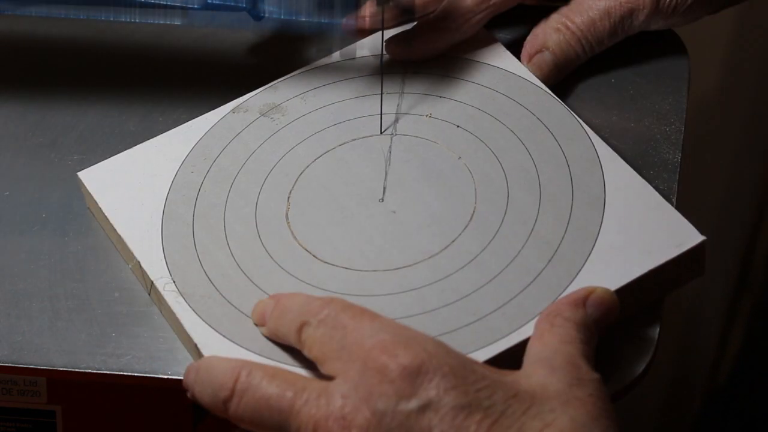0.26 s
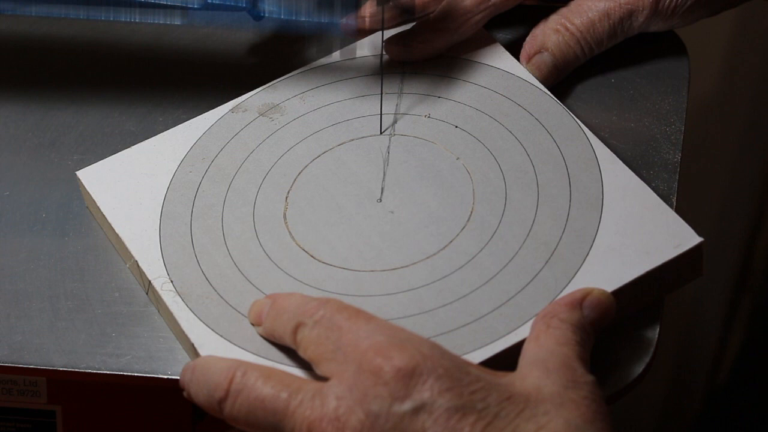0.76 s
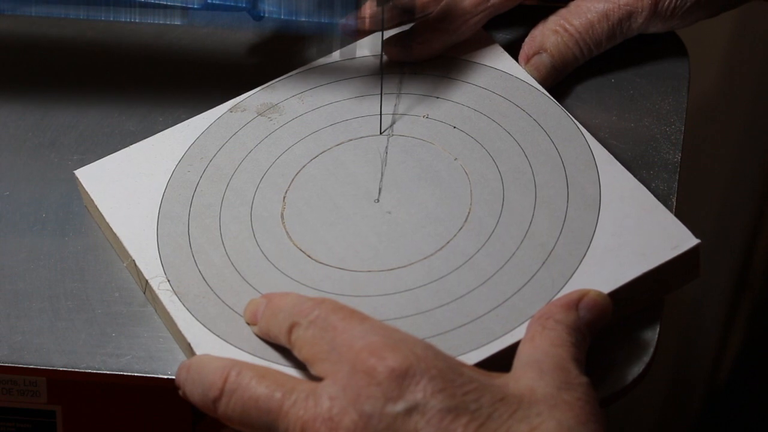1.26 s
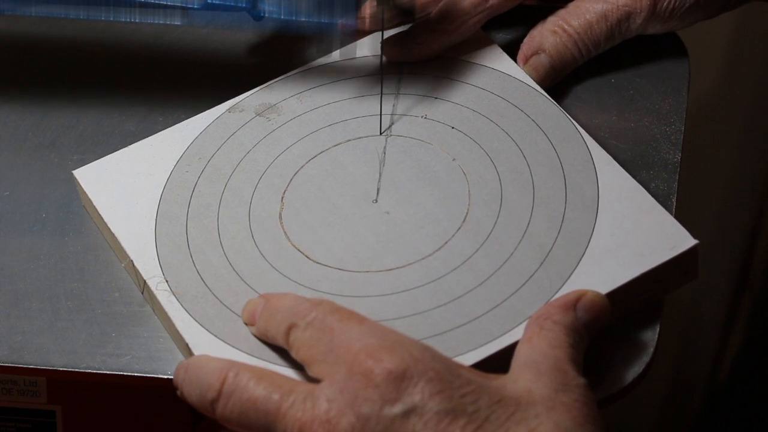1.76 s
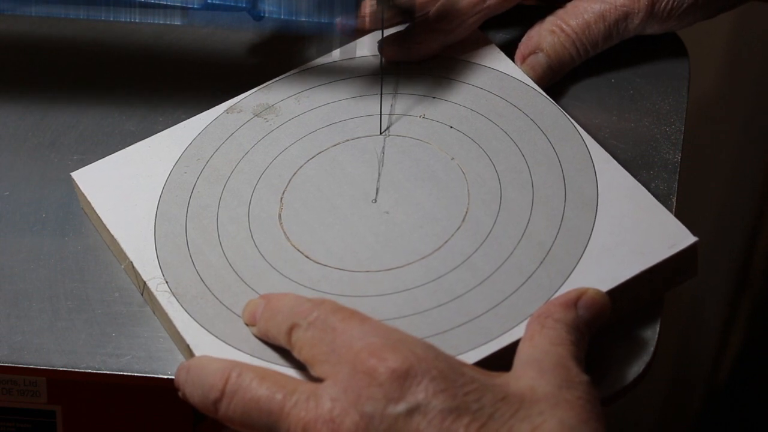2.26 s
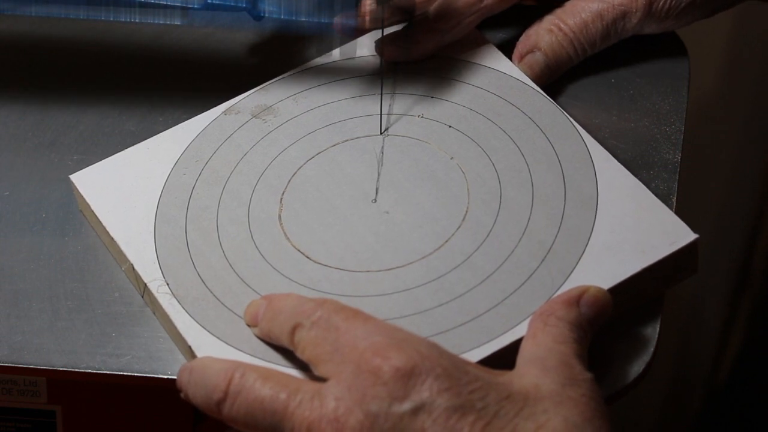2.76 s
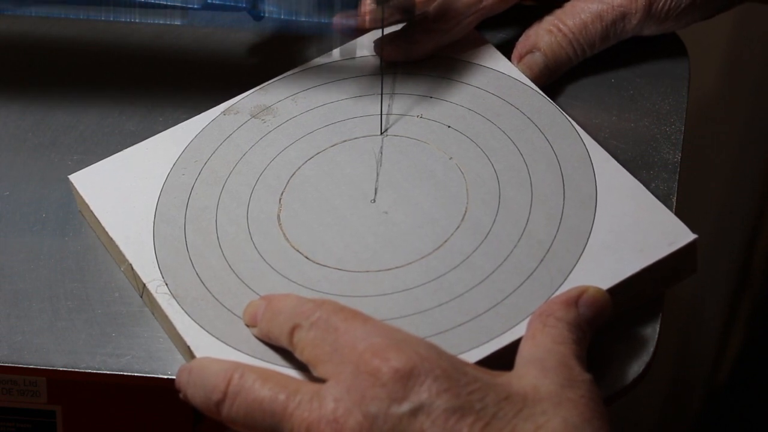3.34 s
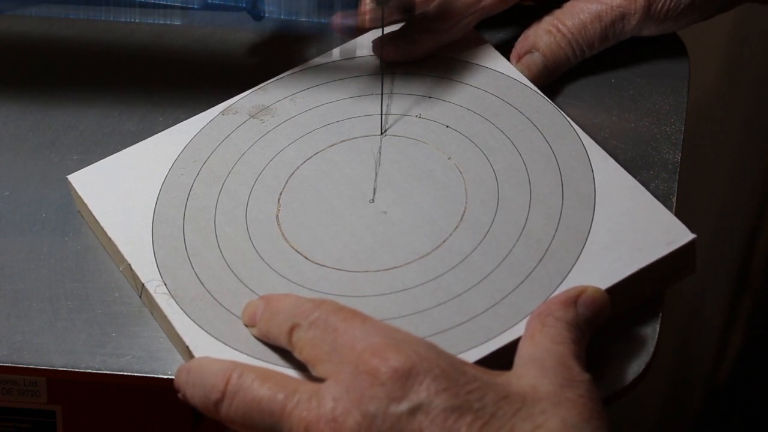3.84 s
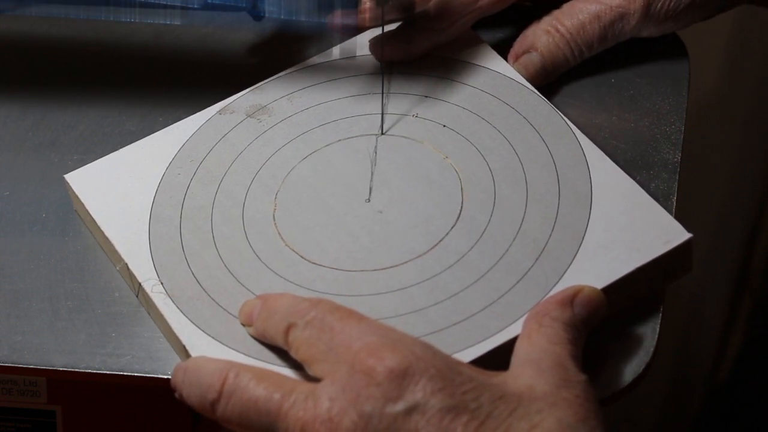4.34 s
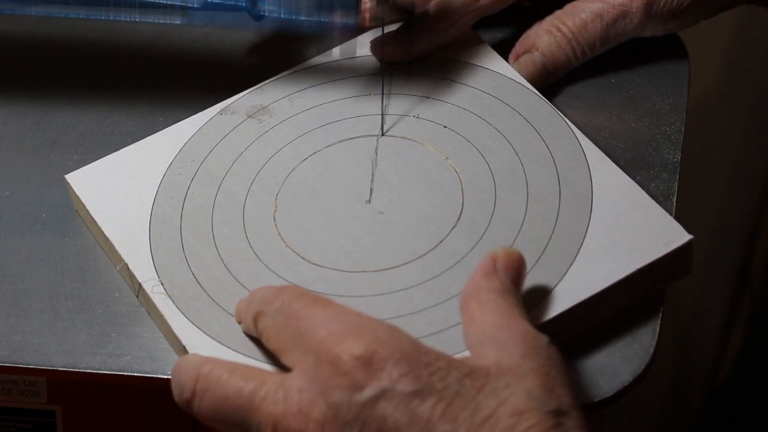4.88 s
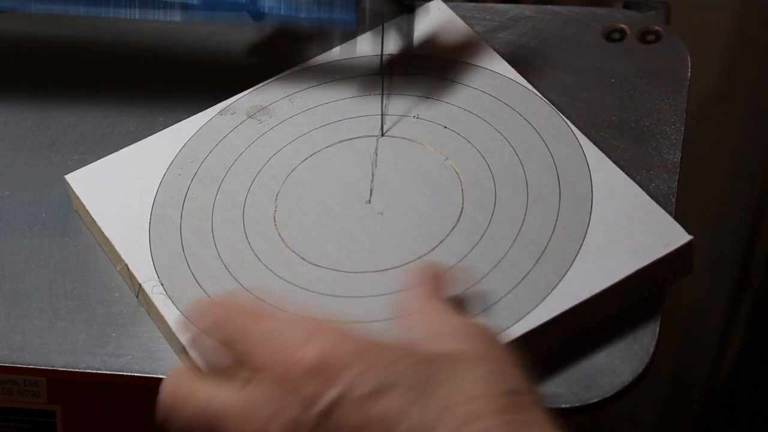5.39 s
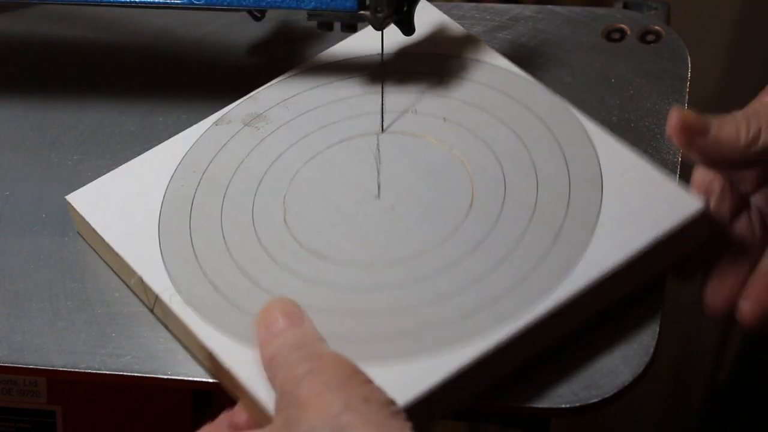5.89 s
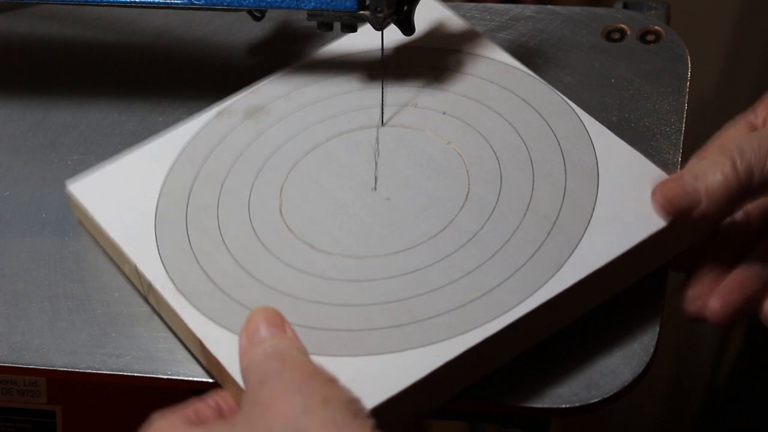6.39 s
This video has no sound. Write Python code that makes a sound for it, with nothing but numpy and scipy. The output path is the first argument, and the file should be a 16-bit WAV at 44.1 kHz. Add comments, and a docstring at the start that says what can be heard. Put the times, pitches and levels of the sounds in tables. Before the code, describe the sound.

In a small workshop, close up, a scroll saw cuts wood with a fast, rough buzz of about 28 strokes per second, rattling and rasping. Cutting stops after four seconds and the motor coasts down, its clacks spreading apart and fading with scratchy rubs and airy puffs. The board then slides and knocks on the metal table over faint room noise.

```python
"""A scroll saw cuts a board: one crank angle drives frame shake, table hum, board buzz, blade snap and tooth rasp,
as tones at crank multiples and as noise or impulses per stroke through resonances.
Feeding stops, the motor coasts down with rubbing, puffs, creaks and linkage clacks (struck decaying modes).
Hands then slide, knock and push the board on the metal table, over a workshop's short tail and floor noise."""
import sys
import numpy as np
from scipy import signal
from scipy.fft import rfft, irfft, next_fast_len
from scipy.io import wavfile
from scipy.ndimage import uniform_filter1d

SR = 44100
rng = np.random.default_rng(int(sys.argv[2]) if len(sys.argv) > 2 else 0)


def to_wav(sig):
    """Store sig (one row per channel, or 1-D mono) as 16-bit WAV at the path in sys.argv[1].

    Samples outside -1..1 are clipped; the rate is SR.
    """
    pcm = np.clip(np.atleast_2d(sig), -1, 1) * 32767
    pcm = np.round(pcm).astype(np.int16)
    wavfile.write(sys.argv[1], SR, pcm.T)  # frames by channels


N = 291942
T_S = np.arange(N) / SR
IDLE_FROM_S = 4.3
# crank speed: (time [s], speed [strokes/s])
CRANK_SPEED = [(0, 27.823), (2.6, 27.823), (3, 27.852), (4.3, 27.852), (4.45, 27.95), (4.55, 25.7),
               (4.75, 22.278), (5.05, 16.182), (5.35, 10.881), (5.65, 6.294), (5.95, 0)]
# crank orders that the table amplifies: (multiple of crank speed, level [dB])
TABLE_ORDERS = [(13, -12), (14, -3), (15, 2), (16, -4), (17, -14), (18, -11), (19, -4), (20, -12)]
# blade clamp resonances: (frequency [Hz], width [Hz], level [dB])
CLAMP_MODES = [(3920, 30, -31), (4980, 24, 5.5), (5250, 170, 4), (6530, 85, 0.5), (6880, 20, 10),
               (7170, 15, 1), (9090, 250, -7), (10420, 65, -3)]
# blade rubbing in the kerf, spectrum: (frequency [Hz], density [dB per Hz])
RUB_SPECTRUM = [(760, -21), (1300, 6.5), (2080, -2), (2260, -26), (2570, 4), (3680, -2.5), (5050, -2.5),
                (7050, -5.5), (8150, -7.5), (10000, -13), (13000, -55), (22000, -120)]
# dust bellows air, spectrum: (frequency [Hz], density [dB per Hz])
PUFF_SPECTRUM = [(7000, -43), (10500, -10), (13000, -1), (15700, -12)]


def crank():
    """Crank angle in strokes: the integral of crank speed."""
    first_turn = -.41
    return first_turn + np.cumsum(np.interp(T_S, *np.transpose(CRANK_SPEED))) / SR


def speed_share():
    """Crank speed as a share of full speed."""
    s, speed = np.transpose(CRANK_SPEED)
    return np.interp(T_S, s, speed / speed.max())


def saw():
    """The cutting saw: crank-driven parts, each at its own gain."""
    turns = crank()
    hum, buzz, ring, snap, rattle, rasp = cutting_gains()
    chatter = evened(repeating(turns, memory=3.9, fresh=0.18))
    body = table_hum(turns, hum) + 1.3 * board_growl(turns) + 1.76 * buzz * board_buzz(turns)
    plate = 1.01 * ring * insert_plate(turns, chatter)
    return body + plate + snap * blade(turns, snap, chatter) + rattle * arm(turns) + rasp * teeth(turns)


def cutting_gains():
    """Gains of six cutting parts; all but the table hum die when the board is held back."""
    # parts set ringing by the cut: (time [s], table hum [dB], board buzz [dB], insert plate ring [dB])
    body_levels = [(0.0, -42.5, -36, -48), (0.06, -41.5, -37, -39), (0.09, -47, -39.5, -47),
                   (0.31, -40.5, -46, -32.5), (0.43, -40.5, -45, -41.5), (0.57, -43.5, -40.5, -41),
                   (0.65, -40.5, -46, -43), (0.86, -39, -40, -43), (0.95, -41, -44, -44),
                   (1.01, -42, -50, -42), (1.07, -42, -47, -50), (1.3, -41.5, -45, -43),
                   (1.36, -40, -61, -41), (1.4, -39, -44, -36.5), (1.57, -42.5, -40.5, -41),
                   (1.65, -43, -44.5, -43), (1.74, -34, -37.5, -42), (1.87, -40.5, -43, -32.5),
                   (1.94, -37.5, -38.5, -33), (2.51, -39.5, -38.5, -37.5), (2.65, -40.5, -45.5, -35),
                   (2.9, -41.5, -43.5, -37), (2.98, -42, -46, -37), (3.11, -42, -43, -55),
                   (3.36, -43, -42, -37), (3.53, -40, -47, -41), (3.63, -52, -51, -37),
                   (3.71, -43, -44.5, -51), (3.88, -41.5, -41.5, -40), (4.0, -41.5, -51, -41),
                   (4.1, -42.5, -47, -41), (4.3, -42.5, -40.5, -58)]
    # feed pressure as blade snap level: (time [s], level [dB])
    feed_levels = [(0.04, -37.5), (.13, -35), (.25, -44), (.33, -33), (.51, -40), (.65, -33.5),
                   (.79, -38.5), (.97, -30), (1.16, -39), (1.48, -34), (1.74, -34), (1.84, -42.5),
                   (1.98, -36), (2.07, -46), (2.53, -35.5), (2.73, -41), (2.86, -31.5), (3.1, -31),
                   (3.42, -43), (3.55, -31.5), (3.74, -29), (3.93, -36), (4.1, -32.5), (4.18, -33),
                   (4.23, -39)]
    # arm rattle: (time [s], level [dB])
    rattle_levels = [(0.04, -33), (.13, -32.5), (.3, -33), (.55, -36.5), (.67, -33), (.79, -38), (1., -32),
                     (1.16, -34.5), (1.4, -30), (1.62, -36), (1.74, -33), (1.9, -37), (2., -35.5),
                     (2.53, -37), (2.73, -32.5), (3.4, -42.5), (3.64, -37), (4., -45.5), (4.22, -44)]
    # tooth rasp at full feed: (time [s], level [dB])
    rasp_levels = [(0.04, -36), (1., -37.5), (2., -37), (3., -37), (3.5, -38), (4., -41), (4.18, -35.5),
                   (4.23, -41)]
    cut_end_s, let_go_db_per_s = 4.239, 223
    rasp_share, full_feed_db = 0.17, -32  # the rasp follows the feed by this share of its dB
    held = amp(-let_go_db_per_s * np.maximum(T_S - cut_end_s, 0))
    hum, buzz, ring = gains(body_levels)
    snap, rattle = gains(feed_levels)[0], gains(rattle_levels)[0]
    rasp = gains(rasp_levels)[0] * (snap / amp(full_feed_db)) ** rasp_share
    return hum * (T_S < IDLE_FROM_S), buzz * held, ring * held, snap * held + 1e-9, rattle * held, rasp * held


def blade(turns, snap, chatter):
    """Blade snaps at each reversal, bites on and buzzes; the mix follows the snap gain."""
    # stiff, quickly damped blade modes: (frequency [Hz], width [Hz], level [dB])
    snap_modes = [(1815, 210, 0), (2220, 210, 0)]
    # buzzing blade modes: (frequency [Hz], width [Hz], level [dB])
    buzz_modes = [(1680, 540, -11), (1831, 23, 0), (1990, 120, -7), (2194, 39, -2.5)]
    tooth_gap_strokes = .1375  # the next tooth catches just after the reversal
    catches = reversals(turns) + 0.3 * reversals(turns - tooth_gap_strokes)
    burst = resonant(resonant(catches, snap_modes), snap_modes)
    buzzing = resonant(stroke(turns, 0.5, [(0.0023, 0.078, 0.26, 0.8)]) * chatter, buzz_modes)
    # the teeth dig in at once and keep biting for a quarter stroke
    digging = np.clip((0.27 - (turns + 0.036) % 1) / 0.21, 0, 1)
    bite = digging * repeating(turns, memory=11.0, fresh=0.19)
    bitten = resonant(resonant(bite, snap_modes), snap_modes)
    # harder feeding raises the snap faster than the chatter
    burst_gain = 0.83 * (snap / amp(-28.0)) ** 0.4
    buzz_gain = 0.54 * (snap / amp(-17.5)) ** -.3
    return burst_gain * burst + 0.48 * bitten + buzz_gain * buzzing


def teeth(turns):
    """Teeth tear fibres hardest on the down stroke; dust hisses on both strokes."""
    # torn fibres, spectrum: (frequency [Hz], density [dB per Hz])
    rasp_spectrum = [(2120, -62), (3600, -7), (4360, 3.5), (4730, -17.5), (5930, 7.5), (7690, -12.5),
                     (9000, -3.5), (11700, -45), (19800, -120)]
    # sawdust hiss, spectrum: (frequency [Hz], density [dB per Hz])
    dust_spectrum = [(5000, -27), (7500, 2), (9500, -8), (12500, -4), (15700, -9)]
    bite = stroke(turns, 0.19, [(-.03, 0.056, 0.19, 2.45), (.55, 0.083, 0.25, 1.1)]) * grains(1.5)
    dust = stroke(turns, 0.32, [(.0, 0.079, 0.1, 1.45), (.5, 0.071, 0.45, 1.1)]) * grains(3.0)
    clamp = resonant(bite, CLAMP_MODES)
    return 0.75 * shaped(bite, rasp_spectrum) + 0.5 * clamp + 0.52 * shaped(dust, dust_spectrum)


def table_hum(turns, hum):
    """Table: steady crank orders, plus a resonant surge from knocks at each reversal."""
    # table resonances: (frequency [Hz], width [Hz], level [dB])
    table_modes = [(415, 75, 0), (528, 20, -6), (222, 20, -9)]
    steady_db = -42.5
    steady = amp(steady_db) * (T_S < IDLE_FROM_S) * orders(turns, TABLE_ORDERS)
    # power above the steady hum: the board bears down hard
    surge = np.sqrt(np.maximum(hum ** 2 - amp(2 * steady_db), 0.023 * hum ** 2))
    knocks = 60.0 * reversals(turns) + .5 * repeating(turns, memory=7.3, fresh=0.34)
    return steady + surge * resonant(resonant(knocks, table_modes), table_modes)


def board_buzz(turns):
    """Board modes driven by nearly repeating noise, strongest early in the stroke."""
    # board resonances: (frequency [Hz], width [Hz], level [dB])
    board_modes = [(522, 49, -3.5), (688, 14, 6), (728, 24, -5), (1046, 41, -6), (1219, 26, 2),
                   (840, 430, -2.5)]
    force = stroke(turns, 0.57, [(0.029, 0.045, 0.73, 0.49)])
    return resonant(force * repeating(turns, memory=7.7, fresh=0.12), board_modes)


def board_growl(turns):
    """Board chatters on the table: nearly repeating noise through narrow modes."""
    # growl before the mix gain: (time [s], level [dB])
    growl_levels = [(0.0, -54), (0.2, -41), (0.31, -31.5), (0.38, -33.5), (0.47, -41), (0.53, -43),
                    (0.56, -35.5), (0.92, -46), (1.02, -37), (1.21, -46), (1.31, -40), (1.63, -47),
                    (1.7, -39), (1.82, -45), (1.89, -40), (2.89, -39.5), (2.98, -48), (3.04, -39.5),
                    (3.24, -45.5), (3.34, -56), (3.42, -43), (3.5, -50), (3.65, -37.5), (3.75, -49),
                    (3.89, -39), (3.95, -44), (4.2, -42), (4.25, -46)]
    # growl resonances: (frequency [Hz], width [Hz], level [dB])
    growl_modes = [(791, 60, 5), (844, 53, -1), (869, 23, 1), (897.6, 6.8, 9.5)]
    ringing = resonant(resonant(repeating(turns, memory=7.1, fresh=0.044), growl_modes), growl_modes)
    return gains(growl_levels)[0] * (T_S < IDLE_FROM_S) * ringing


def insert_plate(turns, chatter):
    """Insert plate rings from reversal blows and chatter."""
    # plate resonances: (frequency [Hz], width [Hz], level [dB])
    plate_modes = [(1057, 30, -4), (1113, 26, 0)]
    return resonant(20.0 * reversals(turns) + 0.55 * chatter, plate_modes)


def arm(turns):
    """Saw arm modes rattle twice per stroke, unevenly from loose joints."""
    # arm resonances: (frequency [Hz], width [Hz], level [dB])
    arm_modes = [(1468, 27.4, 9.9), (3044, 102, 8.1), (3219, 69, 6.6)]
    looseness = amp(2.5 * evened(uniform_filter1d(rng.standard_normal(N), size=200)))
    force = stroke(turns, 0.27, [(.03, 0.061, 0.33, 1.8), (.6, 0.048, 0.2, 1.2)])
    return resonant(force * repeating(turns, memory=3.6, fresh=0.67) * looseness, arm_modes)


def frame():
    """Frame shake: crank orders, giving way to the stand's own low ring while coasting."""
    # shake orders: (multiple of crank speed, level [dB])
    shake_orders = [(1, -8), (3, -6), (4, -3.5), (5, -2), (6, -11), (7, -13), (8, -5), (9, -9), (10, -10),
                    (11, -12), (12, -11.5)]
    # frame shake before the speed crossfade: (time [s], level [dB])
    shake_levels = [(0.04, -41.5), (0.1, -46.5), (2.87, -46), (3.19, -49.5), (3.55, -45.5), (3.72, -50),
                    (4.48, -49), (4.62, -45.5), (5.3, -44.5), (5.6, -50.5), (5.78, -56), (5.9, -69),
                    (5.96, -75)]
    # stand resonances: (frequency [Hz], width [Hz], level [dB])
    stand_modes = [(123, 26, 0), (72, 25, -6), (165, 40, -7), (225, 40, -8), (330, 50, -9)]
    offset_strokes = .22  # phase offset of the knocks on the stand
    turns, speed = crank(), speed_share()
    drive = 47.0 * reversals(turns - offset_strokes) + repeating(turns, memory=17.0, fresh=0.24)
    stand = resonant(resonant(drive, stand_modes), stand_modes)
    shake = speed ** 2.9 * orders(turns, shake_orders)
    return gains(shake_levels)[0] * (shake + np.maximum(1.1 - 1.14 * speed ** 16.0, .03) * stand)


def coasting():
    """Each slowing stroke rubs blade on kerf, rumbles through table and board, pumps the bellows."""
    # table's ring under slow knocks: (frequency [Hz], width [Hz], level [dB])
    loose_modes = [(400, 45, 0), (225, 45, -5), (500, 60, -5), (330, 50, -6)]
    # idling board resonances: (frequency [Hz], width [Hz], level [dB])
    idle_modes = [(712, 70, -4.5), (856, 10.5, -1.5), (990, 390, -6), (1200, 65, -23)]
    offset_strokes = .22  # phase offset of the coasting knocks and rubbing
    turns, speed = crank() - offset_strokes, speed_share()
    hum, rumble, rub, puff = idling_gains()
    # the slower the crank, the more the sound bunches once per stroke
    bunch = amp(9. * (1 - speed) ** .6 * np.cos(2 * np.pi * turns))
    ringing = resonant(resonant(17.0 * reversals(turns) + rng.standard_normal(N), loose_modes), loose_modes)
    knocked = 0.97 * np.clip(1 - speed ** 44.0, .15, 1) * bunch * ringing
    table = 1.86 * speed ** 20 * orders(turns, TABLE_ORDERS) + knocked
    low = resonant(bunch * stroke(turns, 0.4, [(0.00046, 0.16, 0.99, 0.93)]) * grains(1.2), idle_modes)
    drag = bunch * stroke(turns, 0.087, [(-.05, 0.22, 0.52, 1.9), (.55, 0.026, 0.04, 5.1)]) * grains(2.0)
    pumping = stroke(turns, 0.21, [(0., 0.03, 0.1, 1.5), (.55, 0.044, 0.092, 1.)])
    air = .5 * speed * pumping * rng.standard_normal(N)
    rubbing = 0.77 * shaped(drag, RUB_SPECTRUM) + 0.24 * resonant(drag, CLAMP_MODES)
    return hum * table + rumble * low + rub * rubbing + puff * shaped(air, PUFF_SPECTRUM)


def idling_gains():
    """Gains of table hum, board rumble, rub and bellows once the blade no longer cuts."""
    # idle blade and bellows: (time [s], rub level [dB], bellows level [dB])
    coast_levels = [(4.3, -43, -57), (4.45, -39, -49.5), (4.6, -38, -49), (4.71, -33.5, -47),
                    (4.85, -41, -52), (5.1, -44, -53), (5.26, -44.5, -53), (5.46, -46, -49),
                    (5.62, -51, -48), (5.73, -47.5, -47), (5.96, -110, -88)]
    # table hum, then board rumble: (level at the reference rub [dB], share of the rub's dB changes followed)
    coast_parts = [(-44.5, 0.81), (-40.5, 0.9)]
    rub_reference_db = -40.5
    rub, puff = gains(coast_levels) * ((T_S >= IDLE_FROM_S) & (T_S < coast_levels[-1][0]))[None]
    hum, rumble = (amp(db) * (rub / amp(rub_reference_db)) ** share for db, share in coast_parts)
    return hum, rumble, rub, puff


def scuffs():
    """The slowing blade scuffs the kerf, the bellows puff and a bearing creaks: swelling noise."""
    # (start [s], length before stretch [s], scuff level [dB], puff level [dB])
    scuff_events = [(4.993, 0.015, -41, -48), (5.047, 0.03, -39.5, -49), (5.12, 0.023, -42.5, -52),
                    (5.197, 0.017, -62, -54), (5.265, 0.03, -40.5, -47), (5.373, 0.012, -60, -43),
                    (5.47, 0.027, -41.5, -41), (5.612, 0.039, -41, -44)]
    # bearing creaks: (start [s], length [s], frequency [Hz], width [Hz], level [dB])
    creak_events = [(5.405, .065, 2620, 70, -47), (5.575, .035, 2600, 90, -49),
                    (5.51, .045, 7000, 500, -48)]
    stretch = 1.25
    scuff, puff = sum(amp(db)[:, None] * hump(s, stretch * length, lean=0.58) for s, length, *db in scuff_events)
    grit = grains(0.92)
    creak = sum(amp(db) * hump(s, length, lean=1.6) * resonant(grit, [(hz, width, 0)])
                for s, length, hz, width, db in creak_events)
    scuffing = 1.02 * shaped(grit, RUB_SPECTRUM) + 0.43 * resonant(grit, CLAMP_MODES)
    return scuff * scuffing + puff * shaped(rng.standard_normal(N), PUFF_SPECTRUM) + creak


def linkage():
    """Linkage clacks while coasting: struck low and high modes with a crack."""
    # (time [s], low-set level [dB], high set relative to it [dB])
    clacks = [(4.515, -33, -9), (4.55, -29, -4), (4.591, -24, -5), (4.631, -25.5, -0.5), (4.674, -23, 0),
              (4.716, -23.5, 1.5), (4.762, -25, 3), (4.809, -19.5, 1.5), (4.858, -18, -1.5),
              (4.909, -17, -4), (4.962, -19.5, -10), (5.018, -30, 2), (5.083, -22, -8), (5.148, -39, -16),
              (5.158, -28, -19), (5.221, -24.5, -8), (5.233, -28, -7), (5.302, -24, -13),
              (5.314, -21.5, -7), (5.379, -45, -15), (5.395, -40, -12), (5.407, -29, -21),
              (5.488, -33, -14), (5.505, -25, -10), (5.636, -33, -8)]
    # low linkage modes: (nominal frequency [Hz], level [dB], t60 [s])
    low_modes = [(1117, -6.5, 0.029), (1500, -1.5, 0.014), (1850, 1.5, 0.0073), (2070, 1, 0.0094),
                 (2590, -11, 0.013)]
    # high linkage modes: (nominal frequency [Hz], level [dB], t60 [s])
    high_modes = [(3600, -3, 0.012), (4770, -5, 0.016), (5720, 1, 0.018), (6420, 3, 0.02),
                  (7360, -6, 0.015)]
    return struck(clacks, (low_modes, high_modes), crack=0.87)


def hands():
    """Hands slide the board, knock it on the table and push the table."""
    return board_slides() + table_pushes() + board_bumps()


def board_slides():
    """Stick-slip noise rings the wood and squeaks; grainy noise scrapes."""
    # wood resonances: (frequency [Hz], width [Hz], level [dB])
    wood_modes = [(393, 50, 2), (520, 70, -5), (633, 50, 0), (700, 30, 2), (850, 22, 3)]
    # scrape spectrum: (frequency [Hz], density [dB per Hz])
    scrape_spectrum = [(710, -49), (1200, -14), (2050, -7.5), (2930, -5.5), (4810, -15), (5530, -15),
                       (7010, -14), (15700, -18.5)]
    # squeak resonances: (frequency [Hz], width [Hz], level [dB])
    squeak_modes = [(2280, 70, -3), (2950, 160, 0), (4320, 80, -7), (4650, 160, -9), (6830, 100, -6)]
    rumble, scrape = sliding_gains()
    slips = rng.standard_normal(N) * amp(26.0 * uniform_filter1d(rng.standard_normal(N), size=100))
    scraping = 1.35 * shaped(grains(3.8), scrape_spectrum) + 1.1 * resonant(slips, squeak_modes)
    return rumble * resonant(slips, wood_modes) + scrape * scraping


def sliding_gains():
    """Rumble and scrape gains: each slide speeds up, sags as it slows, and stops."""
    # (start [s], rise [s], fall [s], wood rumble level [dB], scrape level [dB])
    slides = [(5.98, 0.0098, 0.071, -40.5, -51), (6.035, 0.055, 0.03, -42.5, -43),
              (6.125, 0.02, 0.052, -32.5, -39.5), (6.202, 0.012, 0.087, -49, -51),
              (6.296, 0.047, 0.0069, -39.5, -42), (6.358, 0.03, 0.07, -48, -60),
              (6.452, 0.022, 0.046, -59, -44.5), (6.51, 0.036, 0.052, -49, -50)]
    sag_db, stop_s = -6, 0.0059
    out = np.zeros((2, N))
    for start, rise, fall, *db in slides:
        u = np.maximum(T_S - start, 0)
        sag = amp(sag_db * np.clip((u - rise) / fall, 0, 1))
        stop = np.exp(-np.maximum(u - rise - fall, 0) / stop_s)
        out += amp(db)[:, None] * np.minimum(u / rise, 1) * sag * stop
    return out


def table_pushes():
    """Hands push the table: low sine thumps under Gaussian envelopes."""
    # (centre time [s], envelope level [dB], frequency [Hz])
    thumps = [(6.131, -38, 101), (6.289, -46, 120), (6.452, -40, 129), (6.472, -47, 109), (6.534, -50, 150),
              (6.585, -48, 120), (6.61, -43, 85)]
    return sum(amp(db) * np.exp(-((T_S - s) * hz) ** 2) * np.sin(2 * np.pi * hz * (T_S - s))
               for s, db, hz in thumps)


def board_bumps():
    """Board knocks on the table: three struck mode sets with a crack."""
    # (time [s], low-set level [dB], deep set relative to it [dB], high set relative to it [dB])
    bumps = [(5.977, -35.5, -17, 0), (5.988, -31.5, -21, -22), (6.066, -39, 9, -10), (6.134, -22.5, -7, -7),
             (6.139, -24.5, -2, -3), (6.163, -44, 14, -15), (6.2835, -24.5, -3, 7), (6.291, -26, 4, -25)]
    # low bump modes: (nominal frequency [Hz], level [dB], t60 [s])
    low_modes = [(480, -5, .04), (573, -3, 0.045), (675, -1, .06), (732, 0, 0.07), (861, -5, .08),
                 (960, -7, .035)]
    # deep bump modes: (nominal frequency [Hz], level [dB], t60 [s])
    deep_modes = [(290, -1, 0.046), (385, -1.5, 0.068)]
    # high bump modes: (nominal frequency [Hz], level [dB], t60 [s])
    high_modes = [(1040, -0.5, 0.023), (1440, 1, 0.023), (2390, 6, 0.022), (2560, 2, 0.025),
                  (3060, -23, .012), (4120, -15, 0.037)]
    return struck(bumps, (low_modes, deep_modes, high_modes), crack=0.25)


def workshop(x):
    """A short diffuse tail from the walls: decaying noise after a 4 ms gap."""
    t = np.arange(12000) / SR
    t60_s = 0.11
    tail = rng.standard_normal(len(t)) * amp(-60 * t / t60_s) * (t > .004)
    return signal.fftconvolve(x, tail / np.linalg.norm(tail))[:N]


def workshop_floor(near):
    """Coloured background noise that a gain control holds down under loud near sound."""
    # floor spectrum: (frequency [Hz], density [dB per Hz])
    room_spectrum = [(18, -43), (30, 5), (75, 12), (117, 12), (178, 7), (391, 15.5), (626, -4), (714, 6),
                     (1030, -0.5), (2860, -0.5), (3820, -4.5), (4130, -1.5), (13800, -9), (15700, -7)]
    room_db, duck_share, duck_from_db = -50.5, 0.4, -34  # share of the excess level, threshold
    loud_db = 10 * np.log10(abs(uniform_filter1d(near ** 2, size=20000)) + 1e-12)
    gain = amp(room_db - duck_share * np.maximum(loud_db - duck_from_db, 0))
    return gain * shaped(rng.standard_normal(N), room_spectrum)


def amp(db):
    """Decibels to gain."""
    return 10 ** (np.asarray(db) / 20)


def evened(x):
    """Scales to rms 1."""
    return x / np.sqrt(np.mean(x ** 2) + 1e-20)


def gains(rows):
    """Level columns as gains per sample."""
    s, *columns = np.transpose(rows)
    return [amp(np.interp(T_S, s, c)) for c in columns]


def shaped(x, points):
    """Colours a signal by a spectrum, at rms 1."""
    hz, db = np.transpose(points)
    size = next_fast_len(N)
    bins_hz = np.fft.rfftfreq(size, 1 / SR)
    gain = amp(np.interp(np.log(bins_hz + 1), np.log(hz), db))
    return evened(irfft(rfft(x, size) * gain, size)[:N])


def resonant(x, modes):
    """Passes a drive through parallel resonances, at rms 1."""
    out = np.zeros(N)
    for hz, width, db in modes:
        out += amp(db) * signal.lfilter(*signal.iirpeak(hz, hz / width, SR), x)
    return evened(out)


def struck(events, sets, crack):
    """Each blow rings several sets of decaying modes, the last one with a short crack."""
    t, out = np.arange(4000) / SR, np.zeros(N + 4000)
    for s, db, *set_db in events:
        parts = []
        for modes in sets:
            ring = np.zeros(len(t))
            for (hz, level_db, t60), p in zip(modes, rng.random(len(modes))):
                decay = amp(level_db - 60 * t / np.maximum(t60, .003))
                detuned_hz = hz * (1 + 0.012 * (p - .5))
                ring += decay * np.sin(2 * np.pi * (detuned_hz * t + p))
            ring = ring * np.minimum(t / .0003, 1)
            parts.append(ring / abs(ring).max())
        noise = uniform_filter1d(rng.standard_normal(len(t)), size=3)
        parts[-1] = parts[-1] + crack * noise * np.exp(-t / .0015)
        out[round(s * SR):][:len(t)] += amp(db) * (amp([0, *set_db]) @ np.array(parts))
    return out[:N]


def repeating(turns, memory, fresh):
    """Noise that nearly repeats from stroke to stroke, drifting over `memory` strokes."""
    whole = np.floor(turns).astype(int) + 1
    since = np.arange(N) - np.interp(whole - 1, turns, np.arange(N)).astype(int)
    pattern = rng.standard_normal((whole[-1] + 1, 1600))
    pattern = evened(signal.lfilter([1], [1, -np.exp(-1 / memory)], pattern, axis=0))
    return pattern[whole, since % pattern.shape[1]] + fresh * rng.standard_normal(N)


def stroke(turns, base, humps):
    """Force along a stroke: a base plus humps (place, rise, fall in strokes, height), at rms 1."""
    force = base
    for place, rise, fall, height in humps:
        u = (turns - place) % 1
        force = force + height * (1 - np.exp(-u / rise)) * np.exp(-u / fall)
    return evened(force)


def orders(turns, table):
    """Steady tones at multiples of the crank speed, at rms 1."""
    return evened(sum(amp(db) * np.sin(2 * np.pi * (k * turns + rng.random())) for k, db in table))


def reversals(turns):
    """One impulse each time the blade reverses at the top of its stroke."""
    return np.diff(np.floor(turns + 0.0315), prepend=-1.)


def grains(rough_db):
    """Noise whose strength varies in half-millisecond grains."""
    return rng.standard_normal(N) * amp(rough_db * evened(uniform_filter1d(rng.standard_normal(N), size=25)))


def hump(start, length, lean):
    """A swell of the given length; a small lean makes it rise early."""
    return np.sin(np.pi * np.clip((T_S - start) / length, 0, 1) ** lean) ** 2


def scene():
    """Saw, coasting and hands, with a tail on the blows, over the workshop floor."""
    blows = linkage() + hands()
    near = saw() + frame() + coasting() + scuffs() + blows + amp(-7.5) * workshop(blows)
    return (near + workshop_floor(near))[None]


def record(dry):
    """The band limit: a linear-phase low-pass."""
    edge_hz = 15830
    lowpass = signal.firwin(511, edge_hz, window=("kaiser", 9), fs=SR)
    return signal.oaconvolve(dry, lowpass[None], "same")


dry = scene()
out = record(dry)
to_wav(out)
```